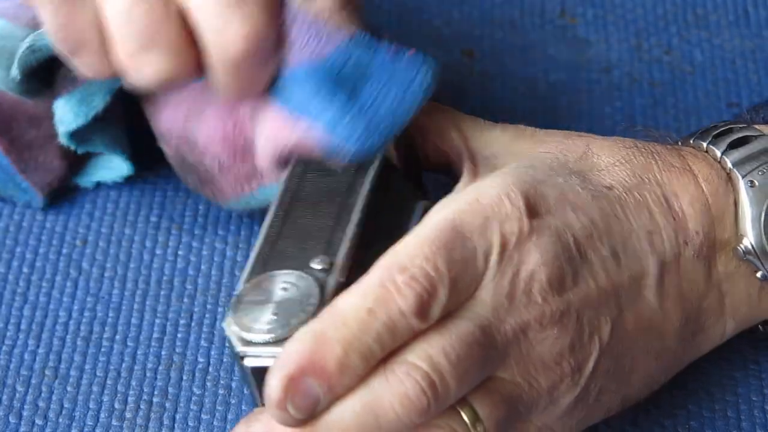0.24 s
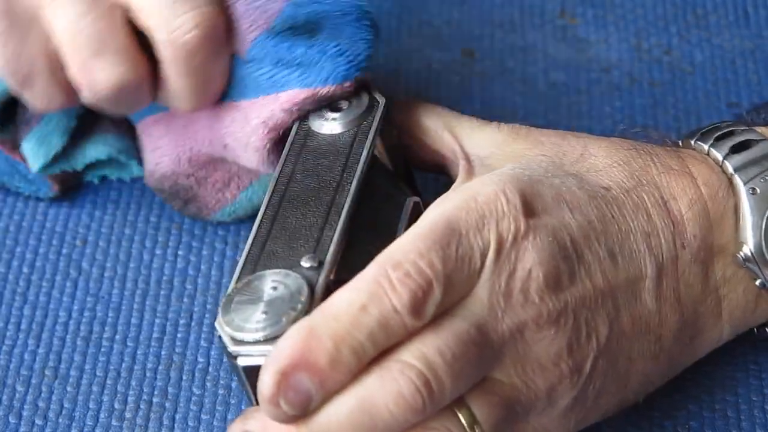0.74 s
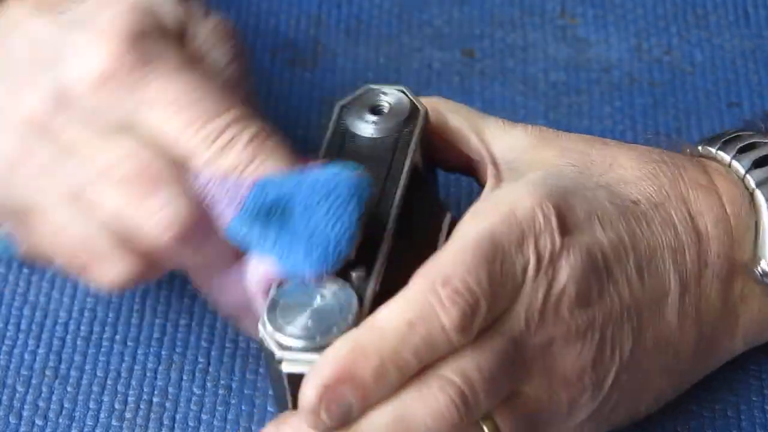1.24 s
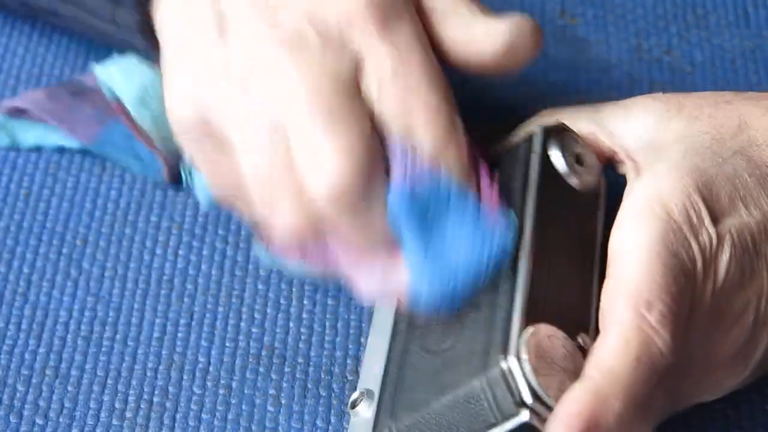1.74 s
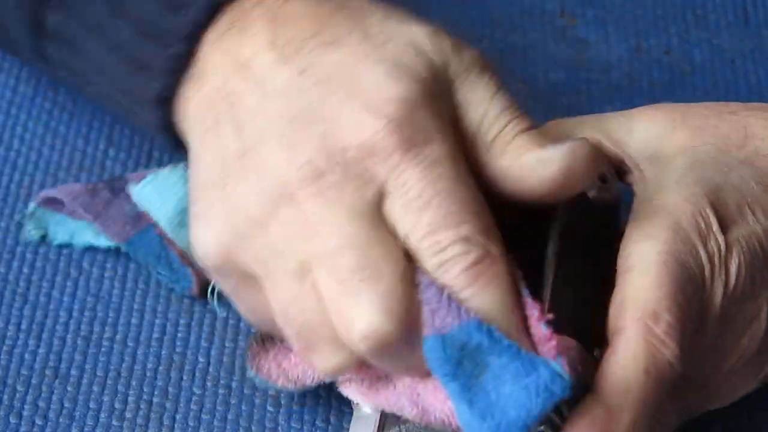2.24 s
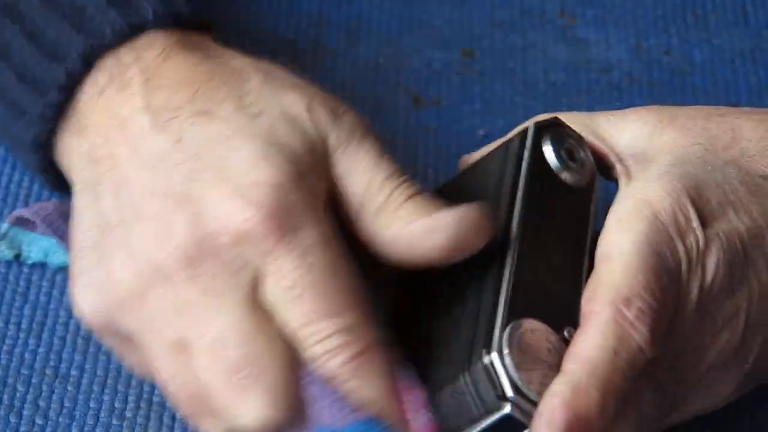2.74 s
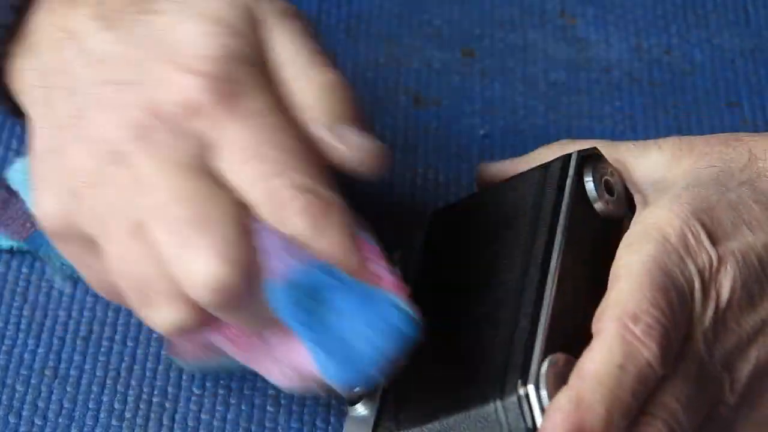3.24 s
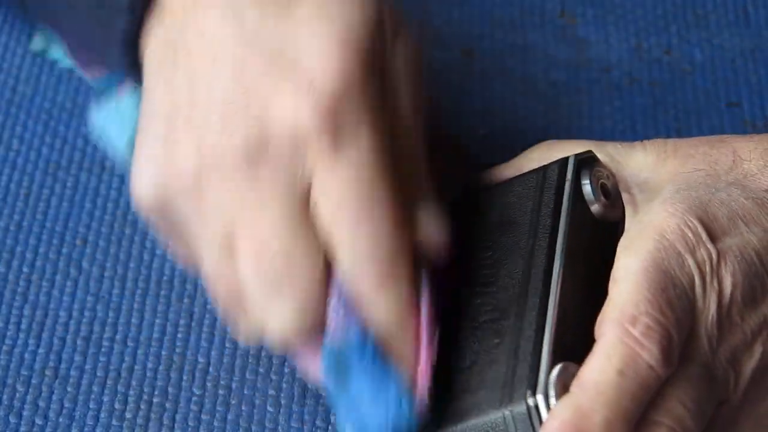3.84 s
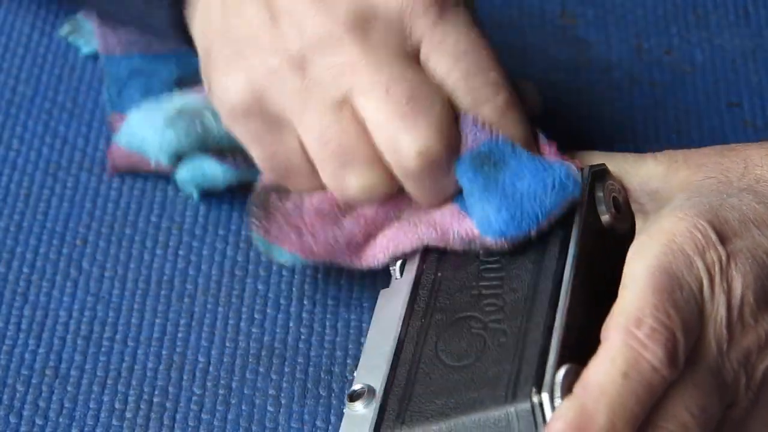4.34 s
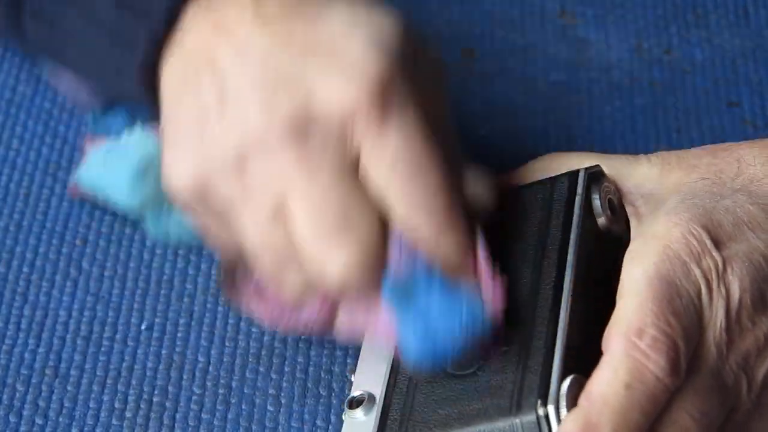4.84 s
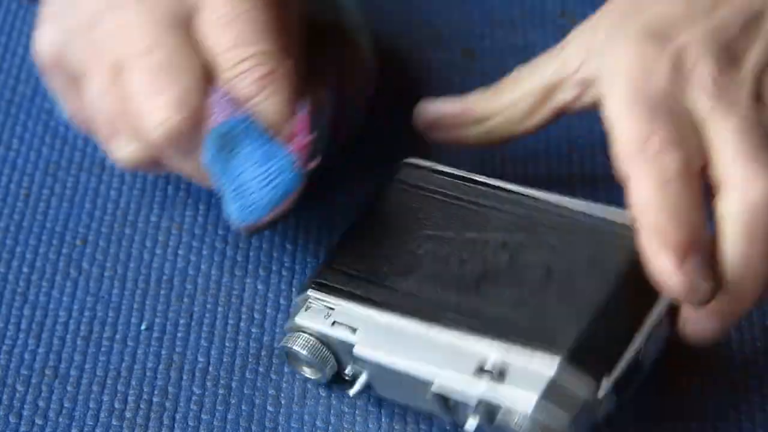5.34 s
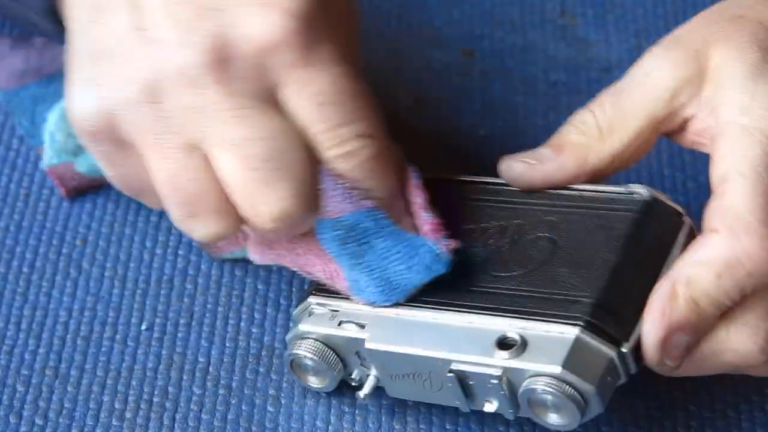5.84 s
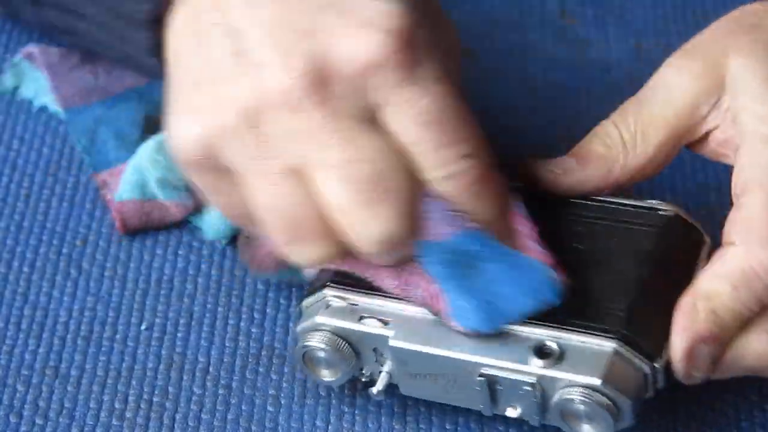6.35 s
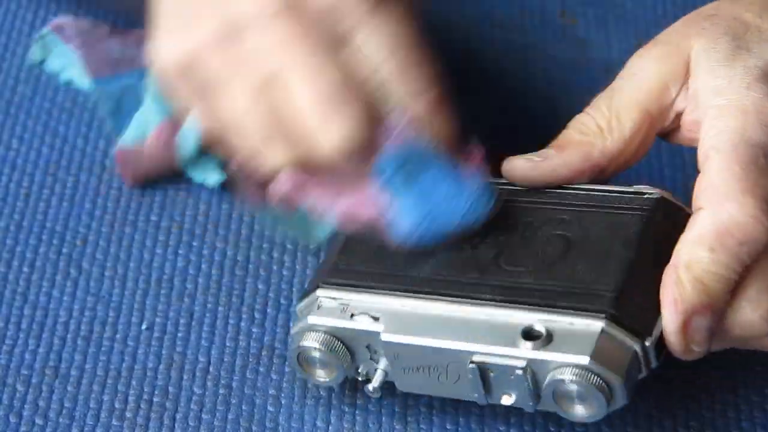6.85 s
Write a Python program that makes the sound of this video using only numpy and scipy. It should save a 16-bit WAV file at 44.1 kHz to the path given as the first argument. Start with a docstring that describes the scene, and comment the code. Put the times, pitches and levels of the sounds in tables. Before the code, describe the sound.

Fast dry rubbing of fabric on a little hollow case, heard closely in stereo. It begins faint and hissy, pauses with a rustle and a hard knock as the grip changes, then grows scratchier with low woody drumming. Small bumps and clicks interrupt; a light metallic click and another shift precede shorter bursts with the case laid down. Low handling rumble and a brief dull small-room tail surround it.

```python
"""A faint rustle over a low rumble, then at once quick hissing strokes: a cloth buffs the leather of a small metal camera.
It is held on a matted workbench in a small room; the hand makes about six or seven strokes a second, turning after each.
Strokes are bunched noise that follows the hand's speed: hiss, scratch and the drumming of the hollow case.
Knocks and clicks ring the modes of the case; hands and loose cloth rustle as noise, and thin squeaks are gliding sines.
The room adds a dull flutter and a short tail, and two microphone ports colour left and right."""
import sys
import numpy as np
from scipy import signal
from scipy.fft import rfft, irfft, next_fast_len
from scipy.io import wavfile

SR = 44100
rng = np.random.default_rng(int(sys.argv[2]) if len(sys.argv) > 2 else 0)


def store_pcm(level_fs):
    """Save levels as 16-bit WAV."""
    pcm = np.round(np.clip(level_fs, -1, 1) * 32767).astype(np.int16)
    wavfile.write(sys.argv[1], SR, np.atleast_2d(pcm).T)


N = 312669
TIME = np.arange(N) / SR  # s
SIZE = next_fast_len(N + SR // 2, real=True)  # leaves space for the room's tail
FREQS = np.maximum(np.fft.rfftfreq(SIZE, 1 / SR), 1)  # Hz


def from_db(db):
    """Decibels to gain."""
    return 10 ** (np.asarray(db) / 20)


def rms_one(x):
    """Scale to unit power."""
    return x / np.sqrt(np.mean(x ** 2) + 1e-20)


def curve(rows):
    """A control joined by straight lines in time."""
    return np.interp(TIME, *np.transpose(rows))


def over_hz(points):
    """A table joined by straight lines over log frequency."""
    hz, value = np.transpose(points)
    return np.interp(np.log(FREQS), np.log(hz), value)


def hump(hz, level_db, centre_hz, fall_db):
    """A gain that is highest at one pitch and falls by so many dB for each octave away from it."""
    return from_db(level_db - fall_db * abs(np.log2(hz / centre_hz)))


def drift(rate_hz):
    """Chance wandering with spread 1, smoothed above the given rate."""
    lowpass = 1 / (1 + (FREQS / rate_hz) ** 2)
    return rms_one(irfft(rfft(rng.standard_normal(SIZE)) * lowpass, SIZE)[:N])


def friction(colour, grain_db, grain_hz):
    """Countless tiny slips, bunched into grains, coloured by what they shake; stereo, rms 1."""
    # Likeness of left and right. Each row: frequency in Hz, likeness from 0 to 1.
    likeness = [(40, 1), (150, 0.74), (800, 0.5), (3000, 0.64), (7000, 0.29), (14000, 0.14)]
    grains = from_db(grain_db * np.clip(drift(grain_hz), -2.5, 2.5))
    slips = rng.standard_normal((2, N)) * grains
    mid, side = rfft(slips, SIZE) * from_db(over_hz(colour))
    alike = np.clip(over_hz(likeness), 0, 1)
    pair = np.sqrt(1 + alike) * mid + np.sqrt(1 - alike) * side * [[1], [-1]]
    return rms_one(irfft(pair, SIZE)[:, :N])


def swing(start, end, crest):
    """Samples of one stroke and the hand's speed there: from rest, fastest at the crest, to rest."""
    at = np.arange(max(int(start * SR), 0), min(int(end * SR), N))
    u = np.clip((at / SR - start) / (end - start), 0, 1)
    crest = np.clip(crest, .05, .95)
    return at, np.sin(np.pi / 2 * np.minimum(u / crest, (1 - u) / (1 - crest)))


def cloth(hiss_power=1.64, drum_power=2.27):
    """Hiss and scratch follow the speed; the case drums only in the fast, hard-pressed middle of a stroke."""
    # Strokes of the cloth, each lasting until the hand turns again.
    # Each row: start in seconds, fastest point from 0 to 1, rub in relative dB, drumming in relative dB.
    strokes = [(0.161, 0.69, -56, -59), (0.304, 0.4, -56, -62), (0.434, 0.4, -58.5, -61),
               (0.575, 0.6, -66, -62), (0.794, 0.25, -50.5, -52), (0.975, 0.18, -50, -55),
               (1.093, 0.14, -48, -52.5), (1.235, 0.12, -49.5, -49.5), (1.684, 0.5, -46, -37),
               (1.878, 0.44, -45, -34.0), (2.0, 0.17, -46.5, -41.0), (2.284, 0.57, -49.5, -44),
               (2.468, 0.35, -49, -49), (2.629, 0.31, -50, -49.5), (2.747, 0.31, -51, -47.5),
               (2.861, 0.31, -52.5, -46.0), (3.043, 0.43, -44.5, -58), (3.192, 0.6, -57.0, -52),
               (3.352, 0.43, -56, -47.5), (3.487, 0.39, -57.5, -50.5), (3.635, 0.47, -57, -53.5),
               (3.769, 0.65, -60, -58), (3.902, 0.65, -55, -49), (4.078, 0.52, -51, -45),
               (4.237, 0.3, -50.5, -48.5), (4.375, 0.58, -51.5, -46), (4.507, 0.46, -49.5, -46),
               (4.652, 0.55, -49, -40), (4.783, 0.35, -50.5, -43), (5.039, 0.8, -54.0, -58.5),
               (5.496, 0.7, -52, -50.5), (5.766, 0.31, -57.0, -50.5), (5.904, 0.24, -54.5, -42.5),
               (6.019, 0.4, -53, -50.5), (6.22, 0.32, -54.5, -54), (6.31, 0.74, -51, -47.5),
               (6.49, 0.18, -53, -51), (6.6, 0.76, -54, -57), (6.78, 0.45, -45, -35),
               (6.911, 0.39, -50, -44.5), (6.99, 0.09, -53.5, -49)]
    # The face under the cloth: first the narrow end, then the broad leather.
    # Each row: beginning in seconds, scratch against hiss in dB before the layer gains.
    faces = [(0, -10), (1.17, -4.5)]
    # Colours of cloth fibres, leather grain, and the case drumming upright and laid on its side.
    # Each row: frequency in Hz, relative level in dB per Hz.
    hiss_colour = [(2000, -24), (4000, -5.5), (5500, -5), (7200, 1), (8500, -7), (10000, -10), (12000, -15),
                   (14000, -30), (16000, -68)]
    scratch_colour = [(500, -20.5), (1000, 1), (1600, 2.5), (2300, 2.5), (3300, 3.5), (4500, -3),
                      (6500, -22), (11000, -82)]
    upright_colour = [(100, -15), (280, -19), (450, 5), (650, 3), (860, 4), (1050, -5.5), (1250, -8),
                      (1600, -7), (2400, -40)]
    laid_colour = [(150, -26), (400, -10), (530, 6), (700, 8), (890, 8), (1050, -7), (1300, -19),
                   (2400, -40)]
    laid_from_s = 5.35
    # the cloth drags on past each turn; a stroke with no near successor runs out
    drag_s, longest_stroke_s = 0.016, .25

    hiss, scratch, drum = np.zeros((3, N))
    turns = [row[0] for row in strokes[1:]] + [np.inf]
    for (start, crest, rub_db, drum_db), turn in zip(strokes, turns):
        end = min(turn + drag_s, start + longest_stroke_s)
        at, speed = swing(start, end, crest)
        scratch_db = [db for since, db in faces if since <= start][-1]
        hiss[at] += from_db(rub_db) * speed ** hiss_power
        scratch[at] += from_db(rub_db + scratch_db) * speed ** hiss_power
        drum[at] += from_db(drum_db) * speed ** drum_power
    fibres = from_db(5.5) * hiss * friction(hiss_colour, grain_db=0.9, grain_hz=500)
    leather_grain = from_db(3.0) * scratch * friction(scratch_colour, grain_db=2.5, grain_hz=244)
    upright = friction(upright_colour, grain_db=3.0, grain_hz=100)
    laid = from_db(-1.0) * friction(laid_colour, grain_db=4.8, grain_hz=108)
    return fibres + leather_grain + drum * np.where(TIME < laid_from_s, upright, laid)


def knocks(rise_cycles=0.63, crack_db=18.5, crack_t60=0.031, low_hz=125, high_hz=13000):
    """Every knock rings the same modes: soft ones on the mat the low modes; hard contacts also crack."""
    # Knocks of the case: low on the mat, hollow on its back, high on metal.
    # Each row: time in seconds, ring drive in dB, centre of the ring in Hz, tick of the contact in dB.
    contacts = [(.245, -41.5, 286, -78), (.967, -39.5, 220, -78), (1.11, -52, 700, -56),
                (1.162, -29, 280, -76), (1.2522, -20.5, 258, -35.5), (1.4907, -44, 595, -72),
                (1.931, -31.5, 635, -52), (2.027, -32, 447, -43), (2.297, -38.5, 380, -49),
                (2.4274, -34.5, 433, -61), (2.5344, -24.5, 532, -70), (2.963, -36.5, 486, -43),
                (3.326, -31.5, 5600, -50), (3.3278, -26, 715, -43), (4.4086, -43.5, 517, -79),
                (5.092, -47.5, 630, -77), (5.1726, -37, 3460, -66), (5.9184, -46, 560, -62),
                (6.943, -45, 655, -68)]
    # Modes of the case on its mat.
    # Each row: frequency in Hz, relative level in dB, 60 dB decay in seconds before the hand's damping.
    modes = [(239.4, 16.5, 0.037), (304, 16, 0.029), (407, 7, 0.033), (505, 19.5, 0.012), (618, 8, 0.031),
             (718, 13.5, 0.027), (860, 12, 0.013), (1145, 16.5, 0.031), (1380, -25, 0.036),
             (1810, 8.5, .018), (2060, 9.5, 0.018), (3260, 17, 0.011), (3700, 9, 0.0085),
             (5550, 24.5, 0.0056), (6200, 24, 0.0054), (6060, 17.5, 0.0031), (6900, 13, 0.0073),
             (9300, 10, .003)]
    # The crowd of short-lived overtones in a hard contact.
    # Each row: frequency in Hz, relative level in dB per Hz.
    crack_colour = [(400, -26), (1100, -4), (1700, -3), (2500, -13.5), (3500, -2.5), (4500, -6.5),
                    (6000, -2), (7200, 2.5), (8200, -10), (10000, -7.5), (12000, -22), (14000, -27),
                    (16000, -42)]
    longest_ring_cycles = 28
    # modes fade with distance from the centre of the ring; the tick spreads widely about its own centre
    ring_fall, tick_hz, tick_fall = 17.5, 1750, 9.5  # falls in dB per octave
    crack_hz = 4940  # a knock cracks as strongly as its main ring shakes the metal at this pitch
    bounce_s, bounce_db = .0105, -17.5  # after every knock the case settles once more, softly

    t = np.arange(SR // 8) / SR
    hz, mode_db, t60 = np.transpose(modes)
    t60 = np.minimum(t60, longest_ring_cycles / hz)  # the gripping hand damps the metal
    cycles = hz[:, None] * t
    decay = from_db(-60 * t / t60[:, None])
    rings = np.sin(2 * np.pi * cycles) * decay * (1 - np.exp(-cycles / rise_cycles))
    overtones = friction(crack_colour, grain_db=2.0, grain_hz=700)
    crack_decay = from_db(crack_db - 60 * t / crack_t60)
    out = np.zeros((2, N))
    for s, level_db, centre_hz, tick_db in contacts:
        main_drive = hump(hz, level_db, centre_hz, ring_fall)
        tick_drive = hump(hz, tick_db, tick_hz, tick_fall)
        ring = ((main_drive + tick_drive) * from_db(mode_db)) @ rings
        crack = hump(crack_hz, level_db, centre_hz, ring_fall) * crack_decay
        for touch, gain in (s, 1), (s + bounce_s, from_db(bounce_db)):
            at = round(touch * SR) + np.arange(len(t))
            out[:, at] += gain * (ring + crack * overtones[:, at])
    # so small a body radiates no deep bass, and the contact time rounds off the top
    band = signal.butter(2, [low_hz, high_hz], "band", fs=SR, output="sos")
    return signal.sosfilt(band, out + 1e-18)


def hands():
    """Skin and loose folds slide with a duller, uneven rustle."""
    # Hands and loose cloth sliding, most when the grip changes. Each row: time in seconds, relative level in dB.
    rustle_level = [(0.0, -55.5), (0.8, -55), (1.33, -51), (1.43, -42), (1.62, -43), (2.25, -48.5),
                    (2.65, -51), (3.05, -48), (3.3, -46.5), (3.48, -58), (4.5, -55.5), (4.95, -49.5),
                    (5.05, -53), (5.17, -49), (5.9, -50), (6.15, -50), (7.09, -47.5)]
    # Colour of the rustle. Each row: frequency in Hz, relative level in dB per Hz.
    rustle_colour = [(300, 1.5), (700, 2), (1050, -1), (1400, 0), (2300, 0.5), (3300, 0), (5500, -1.5),
                     (7300, 2), (9000, -8), (12000, -17.5), (15500, -52)]
    return from_db(curve(rustle_level) - 4.0) * friction(rustle_colour, grain_db=1.0, grain_hz=120)


def squeaks(waver_hz=120):
    """Short unsteady glides, mostly very high: sines whose pitch and level waver by chance."""
    # Thin squeaks. Each row: start and end in seconds, first and last pitch in Hz before the waver,
    # peak level in dB before the chance wavering.
    glides = [(1.394, 1.481, 7650, 8600, -44), (2.206, 2.292, 7670, 8730, -48.5),
              (3.154, 3.247, 9430, 9030, -44), (4.04, 4.118, 9200, 9150, -61),
              (4.92, 4.99, 9300, 9100, -58), (5.438, 5.445, 4640, 5100, -42),
              (6.3, 6.442, 9050, 9550, -49.5)]
    out, waver = np.zeros(N), waver_hz * drift(370)
    for start, end, first_hz, last_hz, level_db in glides:
        at, speed = swing(start, end, 0.46)
        hz = np.linspace(first_hz, last_hz, len(at)) + waver[at]
        tone = np.sin(2 * np.pi * np.cumsum(hz) / SR)
        out[at] += from_db(level_db) * speed ** 2 * tone
    return out * from_db(2.5 * drift(70))


def rumble():
    """Low rumble of room and handling: dark noise whose level rises and falls."""
    # Rumble in the course of time. Each row: time in seconds, relative level in dB.
    rumble_level = [(0.0, -52.5), (0.63, -52), (1.32, -45.5), (1.58, -48), (2.9, -47), (3.18, -47.5),
                    (3.32, -50), (3.49, -57.5), (4.68, -53), (4.82, -52.5), (6.32, -47), (7.09, -46)]
    # Colour of the rumble. Each row: frequency in Hz, relative level in dB per Hz.
    rumble_colour = [(20, -18), (45, -2.5), (75, -7.5), (115, 6.5), (157, -2), (195, -1), (320, -2),
                     (430, -9), (750, -16.5), (1100, -13.5), (1500, -24.5), (4000, -50)]
    return from_db(curve(rumble_level) + 2.5) * friction(rumble_colour, grain_db=0.5, grain_hz=17.0)


def room(x, flutter_cut_hz=1800, t60=0.23, shared=0.64):
    """A dull flutter between floor and ceiling, and a short diffuse tail."""
    # Share of diffuse sound in the room. Each row: frequency in Hz, level in dB.
    diffuse_share = [(100, -6.5), (300, -5), (700, -7), (3000, -9.5), (7000, -9), (14000, -16)]
    flutter_s, flutter_db = .01275, -9.5  # delay and gain of each trip, before its treble loss

    t = np.arange(SR // 2) / SR
    noise, shared = rng.standard_normal((3, len(t))), np.clip(shared, 0, 1)
    tail = np.sqrt(shared) * noise[2] + np.sqrt(1 - shared) * noise[:2]
    tail = tail * from_db(-60 * t / t60) * (t > .008)
    diffuse = rfft(tail / np.sqrt(np.sum(tail ** 2) / 2), SIZE) * from_db(over_hz(diffuse_share))
    delay = np.exp(-2j * np.pi * FREQS * flutter_s)
    trip = from_db(flutter_db) * delay / (1 + (FREQS / flutter_cut_hz) ** 2)
    # 1 / (1 - trip) is the direct sound with endlessly repeated trips
    return irfft(rfft(x, SIZE) * (1 / (1 - trip) + diffuse), SIZE)[:, :N]


def scene():
    """Everything on the bench sounds in the room, over the rumble."""
    return room(cloth() + knocks() + hands() + squeaks() + rumble())


def record(dry):
    """Each microphone port has its own colour; the top is cut."""
    # The two microphone ports, the right one resonating. Each row: frequency in Hz, left minus right in dB.
    ports = [(60, 3), (500, 2.5), (1400, 1.5), (2500, 0.5), (4500, -1), (6000, -4), (7250, -10.5),
             (8200, -8), (9000, 6), (10200, 5), (12000, 13), (15000, 5)]
    cutoff_hz = 15400
    lean = from_db(over_hz(ports) * [[.5], [-.5]])
    lean = lean / np.sqrt(np.mean(lean ** 2, axis=0))  # mean power gain of the pair stays 1
    coloured = irfft(rfft(dry, SIZE) * lean, SIZE)[:, :N]
    top_cut = signal.ellip(10, .1, 80, cutoff_hz, fs=SR, output="sos")
    return signal.sosfilt(top_cut, coloured)


dry = scene()
out = record(dry)
store_pcm(out)
```